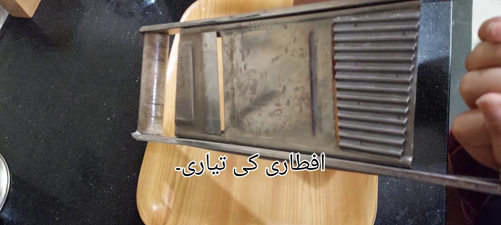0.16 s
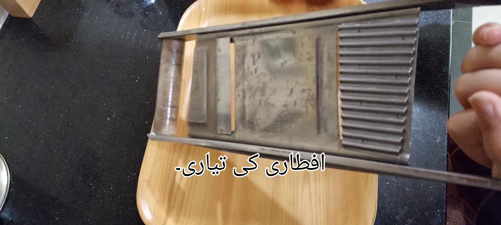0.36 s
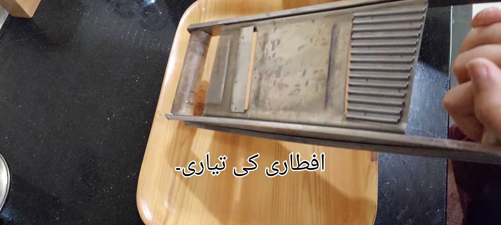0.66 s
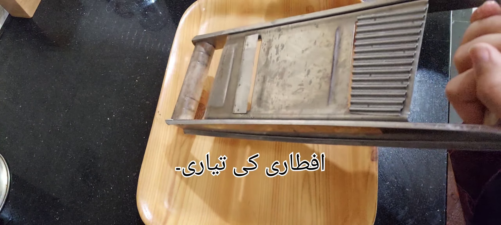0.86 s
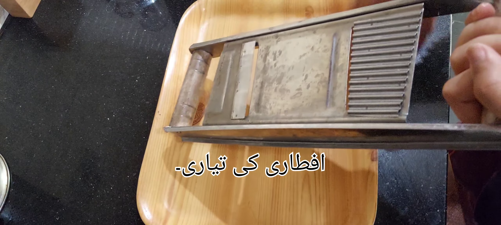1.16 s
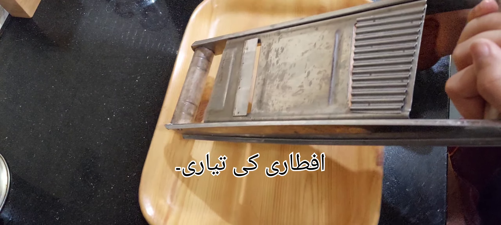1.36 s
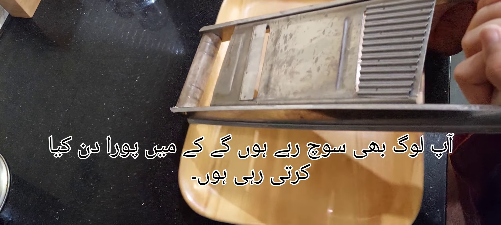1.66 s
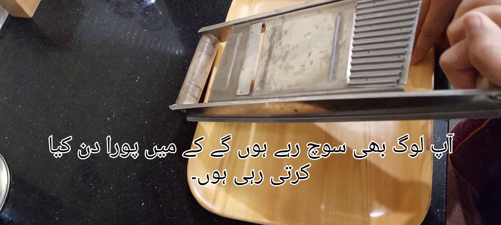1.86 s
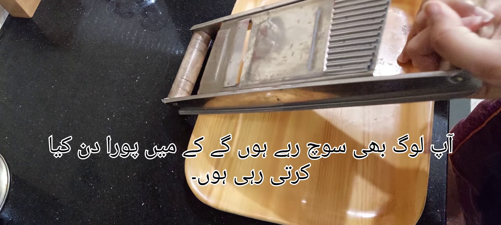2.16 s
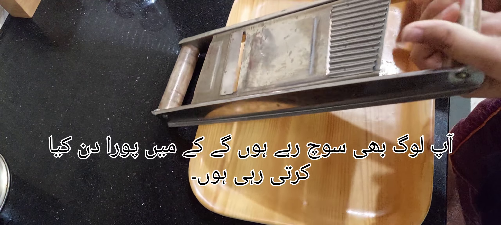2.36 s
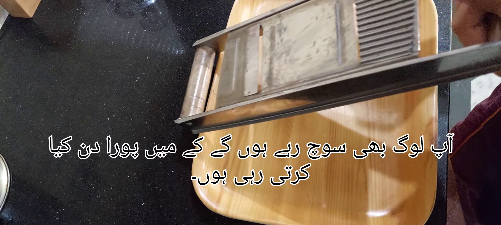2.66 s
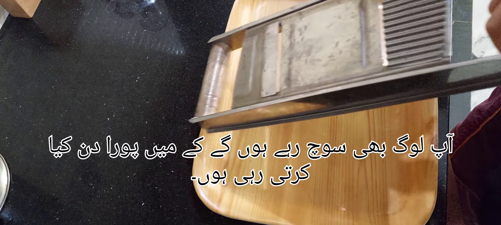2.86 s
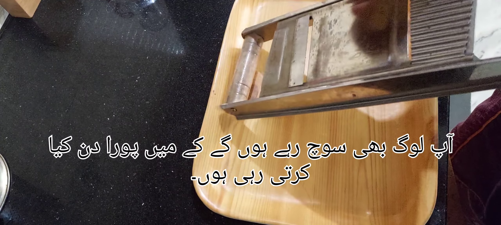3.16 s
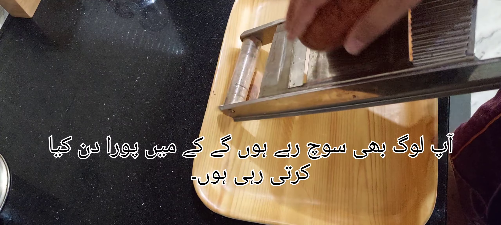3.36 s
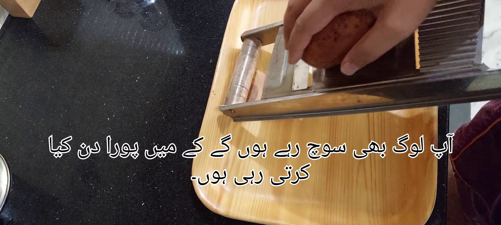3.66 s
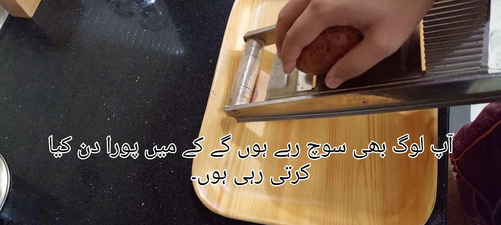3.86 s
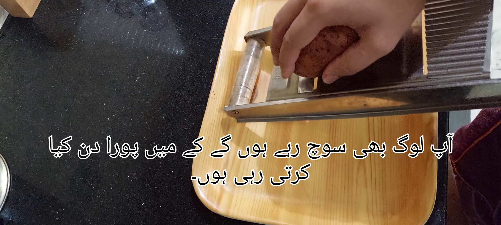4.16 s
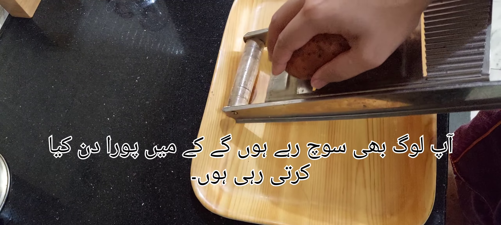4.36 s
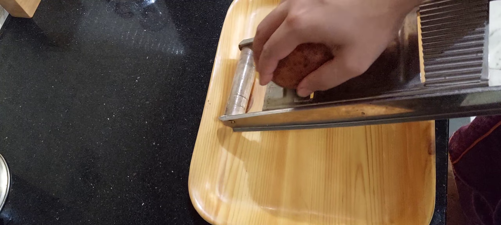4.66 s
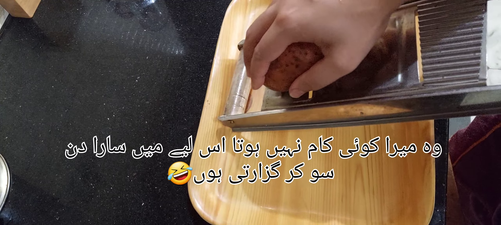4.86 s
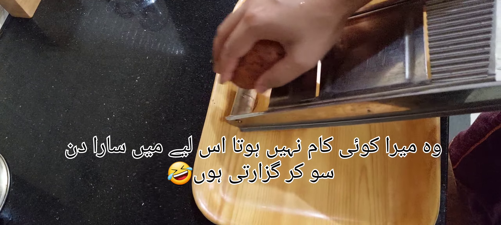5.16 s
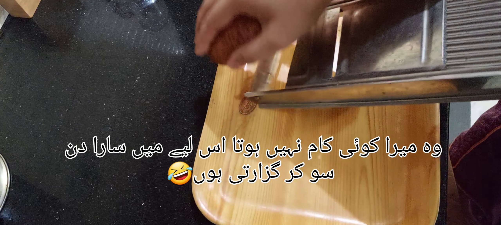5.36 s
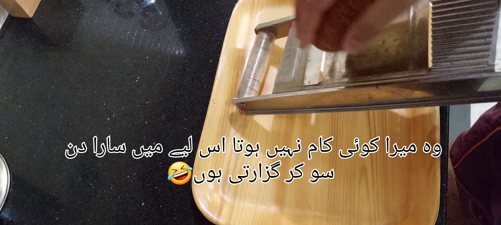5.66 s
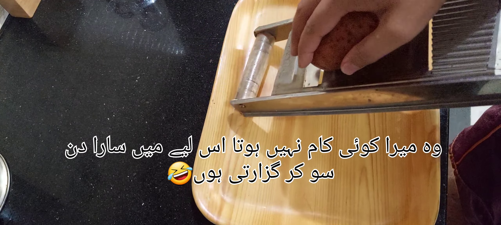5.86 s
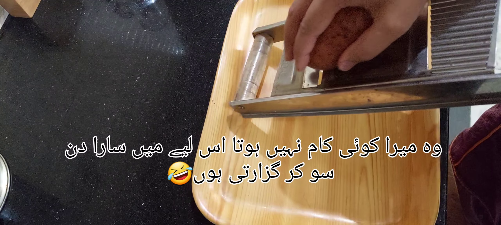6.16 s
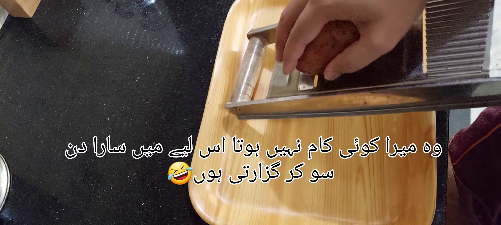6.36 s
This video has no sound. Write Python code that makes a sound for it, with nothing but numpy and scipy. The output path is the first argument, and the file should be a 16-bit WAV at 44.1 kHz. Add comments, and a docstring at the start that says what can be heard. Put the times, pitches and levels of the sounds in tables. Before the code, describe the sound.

In a small kitchen, a motor drones faintly while a steel mandoline is shifted on a wooden tray. Its feet scrape and judder, its frame knocks with a short metallic ring, and two thin squeals slip out. After the loudest knock, a potato is pushed through the blade in soft, wet, halting shoves, ending in a crisp snap. Another clack and a few faint shoves follow, all heard close up.

```python
"""A motor drones somewhere behind a small kitchen. A steel mandoline is shifted about on a wooden tray: its
feet stick and slip, its frame knocks and rings and fingers slide over the wet steel, while farther off a thin
squeal comes twice. Then a potato is set down on the plate and pushed through the blade in wet, halting shoves,
its cells bursting in a fine hiss. It is set down again, and a few faint shoves follow."""
import sys
import numpy as np
from scipy import signal
from scipy.fft import rfft, irfft
from scipy.io import wavfile

SR = 44100
rng = np.random.default_rng(int(sys.argv[2]) if len(sys.argv) > 2 else 0)


def int16_out(signal):
    """Quantize to a 16-bit WAV file."""
    q = np.round(np.clip(np.atleast_2d(signal).T, -1, 1) * 32767)
    wavfile.write(sys.argv[1], SR, q.astype(np.int16))


N = 286650
TIME = np.arange(N) / SR


def from_db(db):
    """Decibels to gain."""
    return 10 ** (np.asarray(db) / 20)


def rms_one(x):
    """Scale to unit power."""
    return x / np.sqrt(np.mean(x ** 2) + 1e-20)


def at_hz(points, hz):
    """Read a table on a log-frequency axis."""
    known_hz, values = np.transpose(points)
    return np.interp(np.log(np.maximum(hz, 1)), np.log(known_hz), values)


def colour(x, spectrum):
    """EQ a steady sound to a curve; rms 1."""
    size = x.shape[-1]
    hz = np.arange(size // 2 + 1) * SR / size
    return rms_one(irfft(rfft(x) * from_db(at_hz(spectrum, hz)), size))


def cut(x, hz, kind, order=2):
    """Butterworth filter."""
    return signal.sosfilt(signal.butter(order, np.clip(hz, 10, SR * .45), kind, fs=SR, output="sos"), x)


def resonate(x, hz, width_hz):
    """One resonance, gain 1 at its peak."""
    r = np.exp(-np.pi * width_hz / SR)
    feedback = [1, -2 * r * np.cos(2 * np.pi * hz / SR), r * r]
    return signal.lfilter(np.array([1, 0, -1]) * (1 - r * r) / 2, feedback, x)


def fade(t, t60):
    """Free decay, 60 dB down after t60 seconds."""
    return np.exp(-np.log(1000) * t / t60)


def drift(per_s):
    """Random modulation gliding through per_s values a second; rms about 1."""
    knots = rng.standard_normal(4000)
    return np.interp(TIME * per_s, np.arange(len(knots)), knots) * np.sqrt(3 / 2)


def strokes(rows, attack_s, sag_db_per_s, release_db_per_s):
    """Envelope of sliding movements: each takes hold, eases off as it goes and dies away."""
    gain = np.zeros(N)
    for start, length, db in rows:
        t = TIME - start
        loss_db = sag_db_per_s * np.clip(t, 0, length) + release_db_per_s * np.maximum(t - length, 0)
        gain = np.hypot(gain, from_db(db - loss_db) * np.clip(t / attack_s, 0, 1) ** 2)
    return gain


# The stereo image. Each row: frequency in Hz, likeness of left and right from 0 (wide) to 1 (mono).
STEREO_LIKENESS = [(150, 0.92), (300, 0.77), (600, 0.36), (2000, 0), (4500, 0), (8000, 0.98), (14000, 0.77)]
def spread(pair):
    """Two unrelated signals become left and right, alike in the bass and the high treble."""
    size = pair.shape[-1]
    alike = np.clip(at_hz(STEREO_LIKENESS, np.arange(size // 2 + 1) * SR / size), 0, 1)
    mid, side = rfft(pair)
    return irfft(np.sqrt(1 + alike) * mid + np.sqrt(1 - alike) * side * [[1], [-1]], size)


def noise(size=N):
    """White stereo noise."""
    return spread(rng.standard_normal((2, size)))


def grains(per_s):
    """Tiny clicks at random moments, of uneven size; stereo, rms 1."""
    return rms_one(spread((rng.random(N) < per_s / SR) * rng.standard_normal((2, N))))


# The drone's fader moves. Each row: time in seconds, level in dB.
DRONE_LEVELS = [(0, -40), (0.6, -45.5), (0.85, -51.5), (1.3, -48), (1.95, -46), (2.7, -52.5), (3.33, -45),
                (3.5, -55), (4.03, -51), (4.2, -68), (5.0, -61), (5.95, -50.5), (6.5, -68)]
# The motor's tones. Each row: pitch in Hz, relative level in dB.
DRONE_TONES = [(108, -8), (154, -3.5), (203, -14)]
def motor(drone_db=-1, waver_hz=3, waver_db=3.0, mains_hz=60, mains_db=-63):
    """A motor's low tones waver in pitch and level over a steady mains hum, a little to the left."""
    drone = sum(from_db(db + waver_db * drift(18))
                * np.sin(2 * np.pi * np.cumsum(hz + waver_hz * drift(20)) / SR) for hz, db in DRONE_TONES)
    fader = from_db(np.interp(TIME, *np.transpose(DRONE_LEVELS)))
    mains = from_db(mains_db) * np.sin(2 * np.pi * mains_hz * TIME)
    return np.sqrt(2) * (from_db(drone_db) * fader * drone + mains) * from_db([[1], [-1]])


# The room tone's EQ. Each row: frequency in Hz, gain in dB.
AIR_EQ = [(22, -16), (45, -24), (100, -3), (220, -14), (350, -14), (520, -19), (950, -23), (1300, -28.5),
          (2500, -33), (3600, -44.5), (5000, -40.5), (6300, -56.5), (7900, -39.5), (8700, -60.5),
          (15800, -55)]
def room_tone(air_db=-50.5):
    """The kitchen's still air is a soft, dark bed of noise."""
    return from_db(air_db) * colour(noise(), AIR_EQ) * from_db([[.9], [-.9]])


# The steel frame's ring, dragged or knocked. Each row: pitch in Hz, level in dB, t60 in seconds.
FRAME_MODES = [(427, -22, 0.14), (615, -10, 0.078), (842.3, -9.5, 0.16), (1017, -24, 0.13),
               (1189, -4.5, 0.093), (1290, -9, 0.051), (1590, -15, 0.11), (1677.4, 0.5, 0.1),
               (1840, -10, 0.18), (1980, -0.5, 0.035), (2146, -0.5, 0.052), (2273, -4.5, 0.1),
               (2632, -9, 0.051), (2529, -11, 0.044), (2910, -15, 0.024), (2980, -16.5, 0.015),
               (4360, -16, 0.021), (5070, -5, 0.027)]
# The EQ of feet rubbing on wood. Each row: frequency in Hz, gain in dB.
DRAG_EQ = [(50, 2.5), (110, 7.5), (210, 6), (400, -6), (900, -2.5), (1600, 2), (2300, -2), (3200, -7),
           (5000, -12), (8000, -20), (15000, -52)]
# Drags across the tray. Each row: start in seconds, length in seconds, level in dB.
DRAGS = [(0.0, 0.33, -57.5), (1.355, 0.089, -30.5), (1.46, 0.43, -41.5), (2.04, 0.28, -44.5),
         (2.4, 0.54, -44), (3.8, 0.033, -51.5), (3.975, 0.038, -57), (5.293, 0.077, -34.5)]
def dragging(rub_db=-5, ring_db=-6, judder_db=0.5, dull_hz=1500, grip_bend=.02):
    """The feet stick and slip on the wood, shaking the frame's lower modes."""
    slips = grains(per_s=2800)
    force = strokes(DRAGS, attack_s=0.022, sag_db_per_s=17, release_db_per_s=230)
    force *= from_db(judder_db * drift(90))
    # each mode swells and fades as the contact wanders
    steel = sum(from_db(db + 2.1 * drift(12)) * resonate(slips, hz, np.log(1000) / (np.pi * t60))
                for hz, db, t60 in FRAME_MODES)
    playhead = np.cumsum(1 + grip_bend * drift(7))  # the changing grip bends their pitch
    bent = np.array([np.interp(playhead, np.arange(N), side) for side in steel])
    ring = rms_one(cut(bent, dull_hz, "low"))
    return force * (from_db(rub_db) * colour(slips, DRAG_EQ) + from_db(ring_db) * ring)


# The EQ of a hit's dense, short-lived modes. Each row: frequency in Hz, gain in dB.
CLACK_EQ = [(300, -15.5), (650, -8), (1100, 3.5), (2200, -3), (3300, -10.5), (5000, -15), (8000, -26.5),
            (15000, -111)]
# Hits on the mandoline. Each row: start in seconds, level in dB, then trims in dB for the treble,
# the tray's thud and the plate's note.
KNOCKS = [(0.081, -33.5, -59, 1.5, -1.5), (0.145, -34, -60, 1, -2), (0.173, -32.5, -63, 2, -3),
          (1.341, -28.5, -23, -2.5, 0), (1.355, -23, -19, -22, -0.5), (1.387, -22, -43, -4.5, 0.5),
          (1.405, -14, -19, -12, -20), (1.424, -19, -65, -6, -2), (1.592, -31, -33, 2, -1),
          (2.05, -29, -24, -1.5, -16), (2.346, -25, -37.5, -18, -20), (2.381, -23.5, -25.5, -9.5, -31),
          (2.43, -27, -22, 0, -6), (2.539, -16.5, -9, -5.5, -16), (2.564, -20.5, -15, -8.5, -2),
          (2.916, -39.5, -18, 3.5, -12), (3.183, -7.5, -25, -15.5, -7), (3.239, -21.5, -21.5, -2, -25),
          (3.273, -21, -29, -7.5, 1.5), (3.41, -28, -27, -10, 0), (5.545, -36.5, -22, -4.5, -0.5),
          (5.845, -11, -22.5, -16, -35)]
def knocks(ring_db=-16, uneven_db=0.5, grip_detune=0.0044, clack_db=-9, clack_t60=0.076,
           edge_db=12, edge_hz=2900, tick_db=-3, tick_t60=0.039,
           plate_db=-3, plate_hz=1173.5, plate_t60=0.034,
           thud_db=-9, thud_t60=0.18, boom_db=-17, boom_hz=116, boom_t60=0.47):
    """Each blow ticks, clacks, rings the steel anew and thuds through the tray."""
    out, t = np.zeros((2, N + SR)), np.arange(SR // 2) / SR
    hz, mode_db, t60 = np.transpose(FRAME_MODES)[:, :, None]
    for start, level_db, treble_db, bass_db, note_db in KNOCKS:
        # the place of contact decides how strongly each mode rings; the grip bends its pitch a little
        strength = from_db(mode_db + uneven_db * rng.standard_normal(hz.shape))
        pitch = hz * (1 + grip_detune * rng.standard_normal(hz.shape))
        phase = rng.uniform(0, 2 * np.pi, hz.shape)
        phase = phase + 1.23 * rng.standard_normal((2, *hz.shape))  # each side hears its own mix
        ring = (strength * fade(t, t60) * np.sin(2 * np.pi * pitch * t + phase)).sum(axis=1)
        clack = colour(noise(len(t)), CLACK_EQ) * fade(t, clack_t60)
        body = from_db(ring_db) * ring + from_db(clack_db) * clack
        # a soft contact leaves the upper modes quiet; a hard one wakes them and adds a tick
        edge = from_db(edge_db + treble_db / 2) * cut(body, edge_hz, "high", order=4)
        body = cut(body, edge_hz, "low", order=4) + edge
        tick = rms_one(cut(cut(noise(len(t)), 2700, "high"), 3700, "low", order=1))
        tick *= from_db(tick_db + treble_db) * fade(t, tick_t60)
        plate = np.sin(2 * np.pi * plate_hz * t + [[0], [.8]])
        plate *= from_db(plate_db + note_db) * fade(t, plate_t60)
        thud = rms_one(cut(noise(len(t)), [110, 390], "band"))
        thud *= from_db(thud_db) * fade(t, thud_t60) * (1 - fade(t, 0.086))
        boom = np.sin(2 * np.pi * boom_hz * t)  # the tray's lowest mode
        boom *= from_db(boom_db) * fade(t, boom_t60) * (1 - fade(t, 0.11))
        blow = body + plate + tick + from_db(bass_db) * (thud + boom)
        onset = round(start * SR)
        out[:, onset:onset + len(t)] += from_db(level_db) * blow * (1 - fade(t, 0.0043))
    return out[:, :N]


# The squeal's resonances. Each row: pitch in Hz, nominal width in Hz, gain in dB.
SQUEAL_MODES = [(340, 29, 3.5), (2590, 49, -19), (2930, 265, -3), (3244, 24, 4.5)]
# Two thin squeals. Each row: start in seconds, length in seconds, level in dB.
SQUEALS = [(0.94, 0.11, -45), (1.8, 0.096, -48.5)]
def squealing(flutter_db=0.5, overtone_db=-24, overtone_hz=4880, overtone_hold_s=0.65, air_db=-15):
    """A fluttering, airy hiss sings in a few narrow resonances; a faint overtone holds on longer."""
    hiss = noise()
    tone = sum(from_db(db) * resonate(resonate(hiss, hz, 2 * width), hz, 2 * width)
               for hz, width, db in SQUEAL_MODES)
    air = from_db(air_db) * rms_one(cut(noise(), [3000, 7000], "band"))
    swell = strokes(SQUEALS, attack_s=0.052, sag_db_per_s=3, release_db_per_s=86)
    flutter = from_db(flutter_db * drift(50.2))
    holds = [(start, overtone_hold_s, db) for start, _, db in SQUEALS]
    held = strokes(holds, attack_s=0.071, sag_db_per_s=0, release_db_per_s=300)
    overtone = rms_one(resonate(resonate(hiss, overtone_hz, 260), overtone_hz, 260))
    return swell * (rms_one(tone) + air) * flutter + from_db(overtone_db) * held * overtone


# Finger slides on wet steel. Each row: start in seconds, length in seconds, level in dB.
WIPES = [(1.43, 0.41, -50.5), (2.0, 0.48, -62.5), (2.58, 0.37, -64)]
def wiping(hiss_db=3, uneven_db=0.5, low_hz=2500, high_hz=9000):
    """Skin slides on the wet plate with a fine, slightly gritty hiss."""
    grit = cut(cut(grains(per_s=8000), low_hz, "high"), high_hz, "low", order=1)
    pressure = strokes(WIPES, attack_s=0.034, sag_db_per_s=14, release_db_per_s=280)
    return pressure * from_db(hiss_db + uneven_db * drift(60)) * rms_one(grit)


# The potato's shoves. Each row: middle in seconds, width at half height in seconds, level in dB.
SHOVES = [(3.81, 0.054, -71.5), (4.177, 0.064, -55), (4.392, 0.089, -61), (4.538, 0.084, -55),
          (4.78, 0.12, -50), (5.102, 0.14, -44.5), (5.316, 0.15, -55.5), (6.092, 0.064, -58),
          (6.283, 0.066, -51.5), (6.5, 0.052, -58.5)]
# Crisp snaps of flesh. Each row: start in seconds, level in dB.
SNAPS = [(3.836, -44), (5.285, -28.5), (5.922, -40)]
# The faint creep between shoves. Each row: start in seconds, length in seconds, level in dB.
CREEPS = [(3.97, 1.58, -72.5), (5.66, 0.92, -69.5)]
# The EQ of parting flesh. Each row: frequency in Hz, gain in dB.
SLICE_EQ = [(400, -2.5), (1200, 2), (2000, 6.5), (3100, 1), (4200, 5), (6500, 0), (10000, -1.5),
            (14500, -1.5), (15900, -5)]
def slicing(hiss_db=4, squareness=2.1, snap_db=-9, snap_t60=0.055, uneven_db=0.5, patchy_db=2.0):
    """Countless wet cells burst along the edge with each shove; now and then the flesh snaps."""
    swells = [from_db(db) * .5 ** (np.abs(2 * (TIME - middle) / width) ** squareness)
              for middle, width, db in SHOVES]
    shoves = np.sqrt(sum(swell ** 2 for swell in swells))
    creep = strokes(CREEPS, attack_s=0.03, sag_db_per_s=0, release_db_per_s=200.5)
    push = from_db(hiss_db + uneven_db * drift(70)) * np.hypot(shoves, creep)
    snaps = sum(from_db(db + snap_db) * (TIME >= start) * fade(np.abs(TIME - start), snap_t60)
                for start, db in SNAPS)
    # the colour shifts as the edge passes through firmer and softer flesh
    cells = [grains(per_s=12000), grains(per_s=12000)]
    edges_hz = np.geomspace(500, 17000, 11)
    rasp = sum(cut(cells[k % 2], edges_hz[k:k + 2], "band") * from_db(patchy_db * drift(25))
               for k in range(len(edges_hz) - 1))
    return colour(rasp, SLICE_EQ) * (push + snaps)


def worktop(x, echo_db=-2, scatter_s=0.011):
    """Tray, counter and wall send back a quick scatter of echoes, different at each side."""
    t = np.arange(round(.03 * SR)) / SR
    echoes = spread(rng.standard_normal((2, len(t))) * (rng.random(len(t)) < 2500 / SR))
    echoes = echoes * np.exp(-(t / scatter_s) ** 4) * (1 - fade(t, 0.0011))
    return x + from_db(echo_db) * signal.fftconvolve(x, rms_one(echoes) / np.sqrt(len(t)), axes=1)[:, :N]


# The kitchen's reverb time. Each row: frequency in Hz, t60 in seconds.
ROOM_T60 = [(150, 0.85), (1000, 0.49), (3000, 0.5), (12000, 0.42)]
def kitchen(x, wet_db, build_s):
    """Hard walls return a diffuse tail whose treble dies first."""
    t, edges_hz = np.arange(SR) / SR, np.geomspace(60, 16000, 9)
    white = noise(SR)
    tail = sum(cut(white, [low, high], "band") * fade(t, at_hz(ROOM_T60, np.sqrt(low * high)))
               for low, high in zip(edges_hz, edges_hz[1:]))
    tail = tail * (1 - np.exp(-t / build_s))
    return x + from_db(wet_db) * signal.fftconvolve(x, rms_one(tail) / np.sqrt(SR), axes=1)[:, :N]


def scene():
    """The frame fills the room; the blade's hiss stays close and almost dry."""
    frame = kitchen(worktop(knocks() + dragging()) + squealing(), wet_db=-7.5, build_s=0.0076)
    blade = kitchen(slicing() + wiping(), wet_db=-26.0, build_s=0.0088) * from_db([[.4], [-.4]])
    return frame + blade + motor() + room_tone()


def record(dry, cutoff_hz=15900):
    """A steep low-pass takes off the very top."""
    return signal.sosfilt(signal.ellip(10, .2, 70, cutoff_hz, fs=SR, output="sos"), dry)


dry = scene()
out = record(dry)
int16_out(out)
```